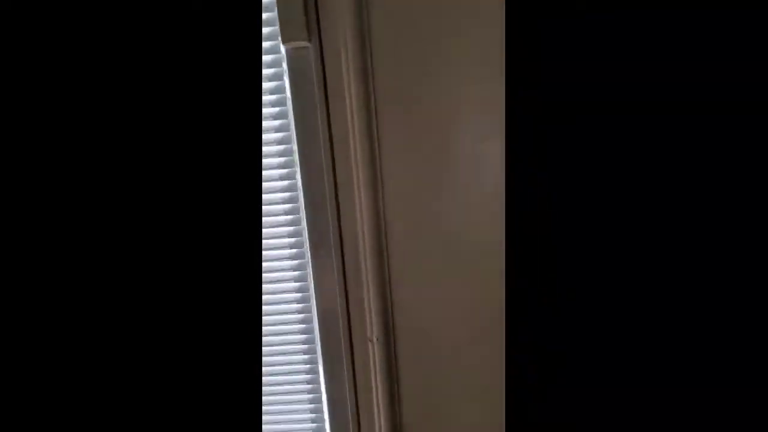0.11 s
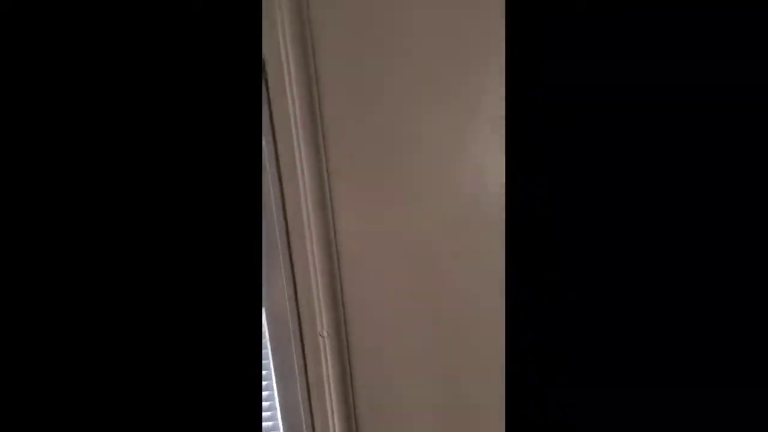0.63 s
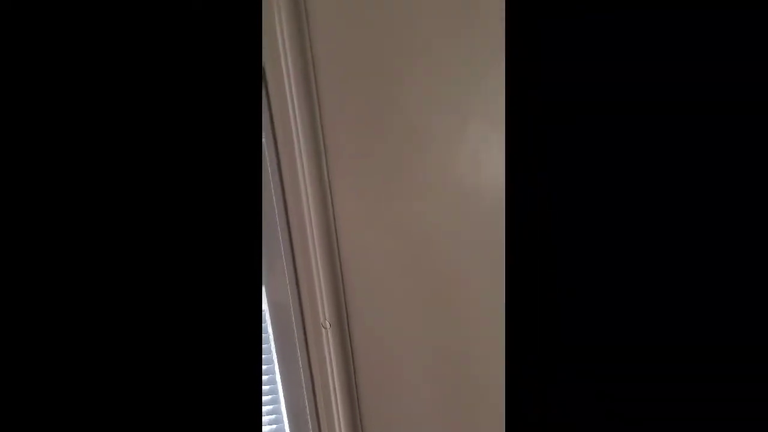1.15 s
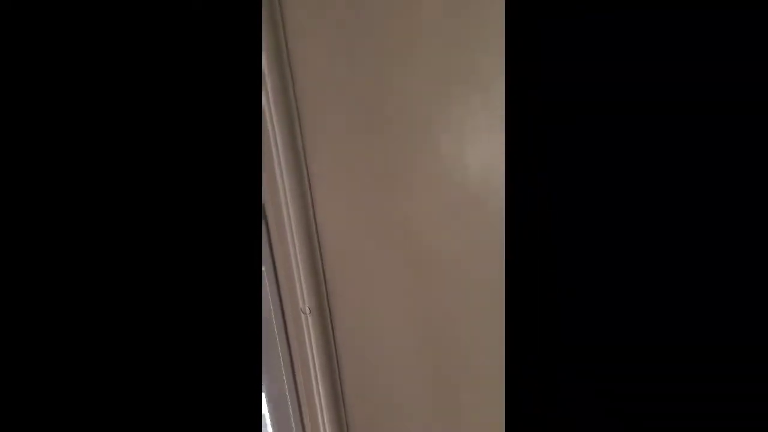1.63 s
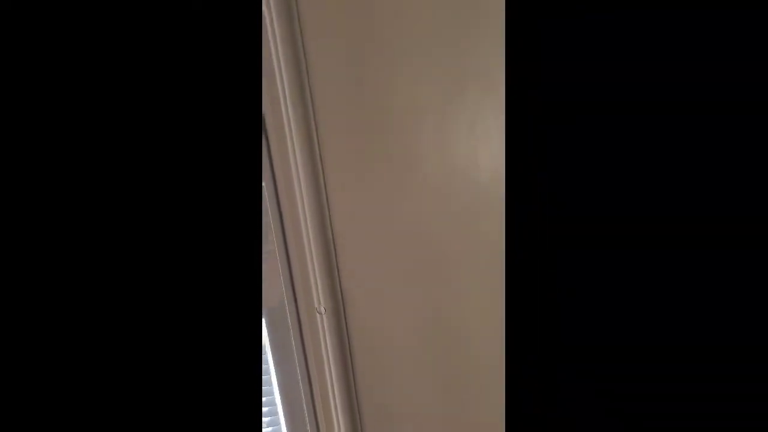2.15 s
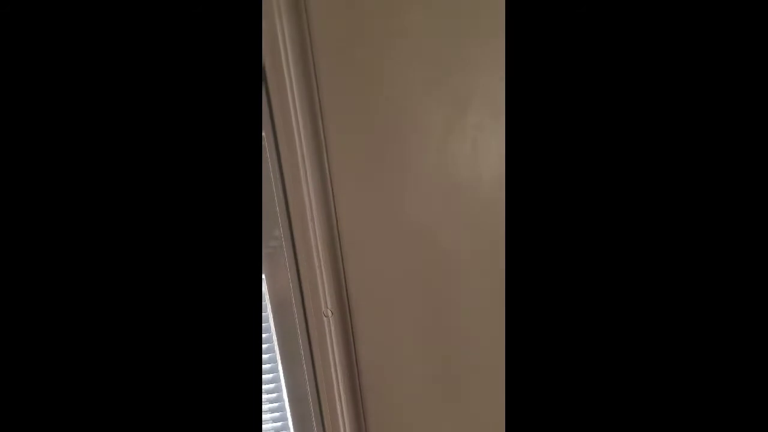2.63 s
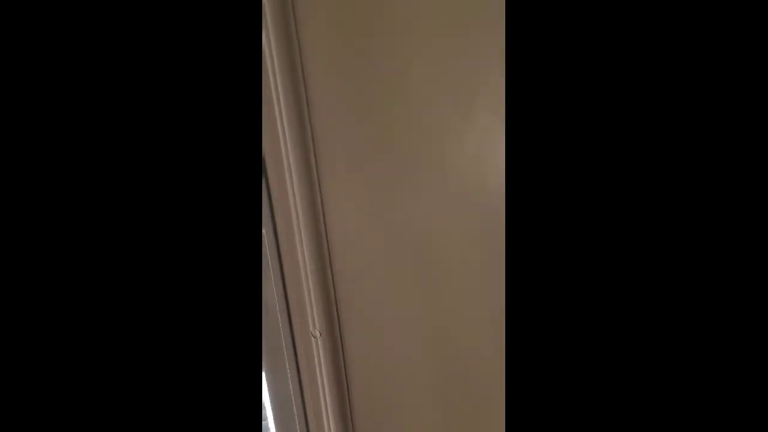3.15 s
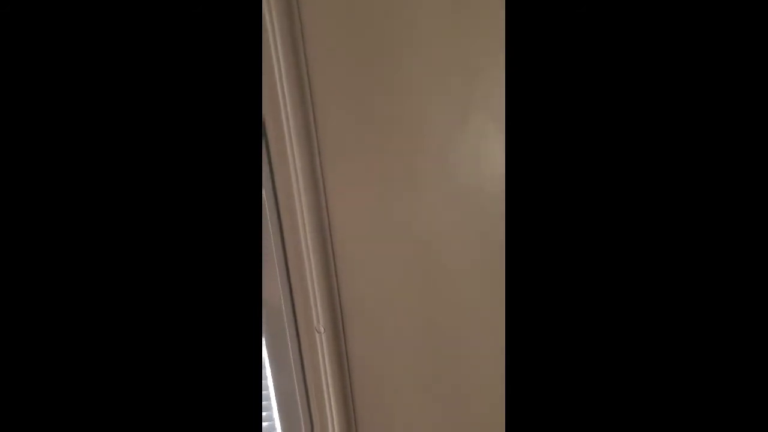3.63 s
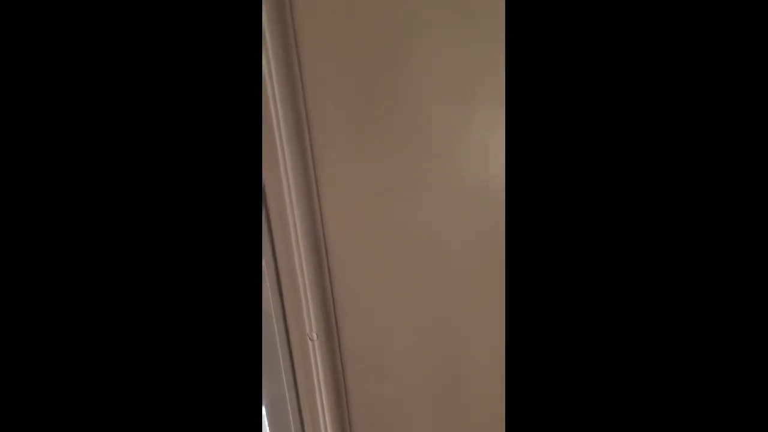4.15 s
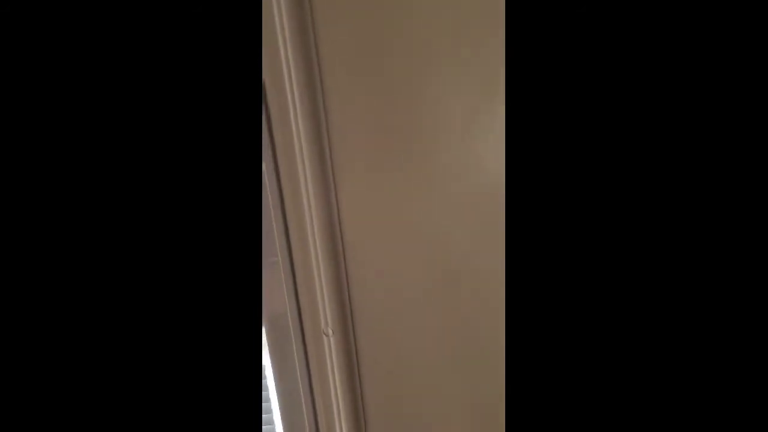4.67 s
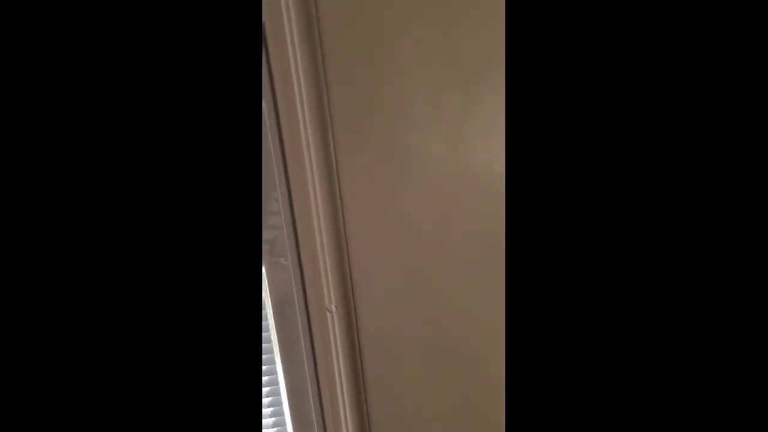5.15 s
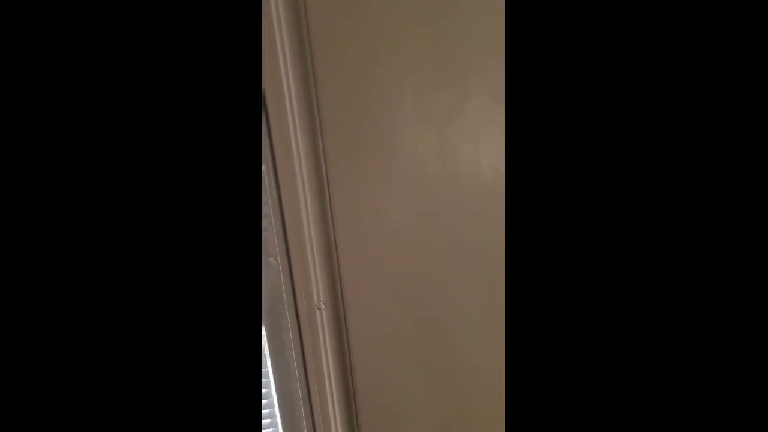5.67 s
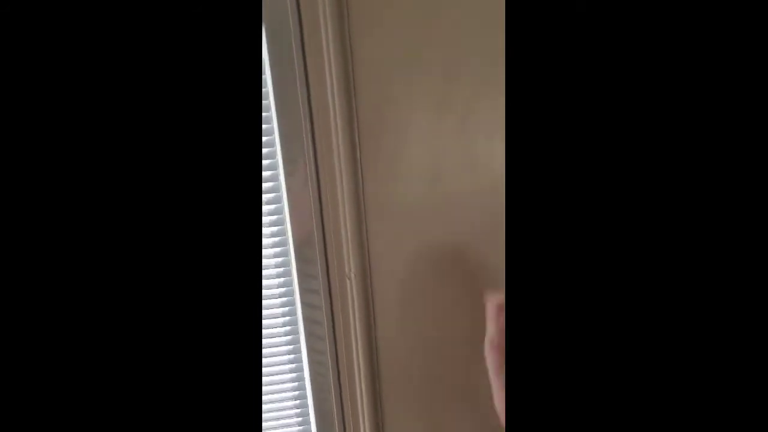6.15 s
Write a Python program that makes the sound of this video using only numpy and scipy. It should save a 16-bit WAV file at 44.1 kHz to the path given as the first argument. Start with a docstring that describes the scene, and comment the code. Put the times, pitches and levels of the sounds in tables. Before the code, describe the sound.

A sticking glazed door thuds against its frame with booming blows, sharp latch clicks and creaky seal rubbing, ringing through bare, empty rooms.

```python
"""A bare apartment: a sticking glazed door is shoved against its frame, close to a handheld two-port microphone.
The leaf booms and bounces: each blow drives decaying modes, a slow sway, pushes of air and a crunch of noise.
Latch and handle click: short chatters of contacts ring wood, metal and springs; a loose part tinkles.
The seal rubs as patchy, creaking noise with small ticks; the empty rooms ring on over a low hush."""
import sys
import numpy as np
from scipy import signal
from scipy.fft import rfft, irfft
from scipy.io import wavfile
from scipy.ndimage import uniform_filter1d

SR = 44100
rng = np.random.default_rng(int(sys.argv[2]) if len(sys.argv) > 2 else 0)


def field_ratio(decibels):
    """Amplitude ratio for a level in dB (20 dB per decade); scalars and array-likes work."""
    return 10 ** (np.asarray(decibels, dtype=float) / 20)


def wav_record(signal):
    """Record a signal, one row per channel, as 16-bit PCM in the file named by sys.argv[1]."""
    frames = np.transpose(np.atleast_2d(signal))
    bounded = np.clip(frames, -1, 1)
    # unit amplitude maps onto the largest positive 16-bit level
    quanta = np.round(bounded * 32767).astype(np.int16)
    wavfile.write(sys.argv[1], SR, quanta)


N = 277026  # length in samples
LEAD = SR // 10  # samples played before the start, so that a blow is already ringing

# what the latch rings with, struck by clicks and by grit in the seal: f/Hz, level/dB, t60/s
LATCH_MODES = [(1375, 12, 0.015), (1725, -5, 0.057), (1970, 0.5, 0.024), (1820, 17.5, 0.0028),
               (2400, 13, 0.0088), (2660, 14, 0.0045), (3210, 0.5, 0.01), (3450, -6, 0.033),
               (4080, 13, 0.0038), (4415, 12.5, 0.0061), (5340, 5.5, 0.0074), (5417, 4, 0.012)]


def evened(x):
    """Scales to rms 1."""
    return x / np.sqrt(np.mean(x ** 2) + 1e-20)


def read(points, hz):
    """Reads a (Hz, value) table on a log-frequency axis."""
    f, value = np.transpose(points)
    return np.interp(np.log(hz + 1), np.log(f + 1), value)


def add(mix, s, sound):
    """Adds a sound at time s."""
    part = mix[..., round(s * SR) + LEAD:][..., :sound.shape[-1]]
    part += sound[..., :part.shape[-1]]


def ring(modes, t):
    """One dying sine a mode, as rows."""
    hz, db, t60 = np.transpose(modes)[:, :, None]
    return field_ratio(db - 60 * t / t60) * np.sin(2 * np.pi * hz * t)


def diffuse(field, size=N + LEAD):
    """Noise at two ports from a magnitude field(Hz, s); the bass is alike at both."""
    # likeness of diffuse sound at the two ports: f/Hz, correlation
    likeness = [(30, 0.94), (150, 0.97), (300, 0.78), (600, 0.24), (1200, -0.2), (2500, 0.13),
                (12000, -0.13)]
    frames = size // 256 + 5
    hz = np.fft.rfftfreq(1024, 1 / SR)[:, None]
    s = (np.arange(frames) * 256 - LEAD) / SR
    a, b, c, d = rng.standard_normal((frames, len(hz), 4)).T
    same = np.clip(read(likeness, hz), -1, 1)
    left = a + 1j * b
    right = same * left + np.sqrt(1 - same ** 2) * (c + 1j * d)
    spectra = np.array([left, right]) * field(hz, s)
    return signal.istft(spectra, nperseg=1024, noverlap=768)[1][:, :size]


def hush():
    """Low rumble of the building and faint air: diffuse noise whose level wavers slowly."""
    # colour of the quiet rooms: f/Hz, relative density/dB
    colour = [(12, -61.5), (27, -32.5), (54, 7.5), (112, -12), (328, -26), (419, -19), (903, -33),
              (1650, -28), (3370, -42), (4310, -42.5), (12200, -63.5), (14000, -77)]

    def field(hz, s):
        waver_db = 2.85 * evened(uniform_filter1d(rng.standard_normal(len(s)), size=30))
        return field_ratio(read(colour, hz) + waver_db)

    return field_ratio(-52.5) * evened(diffuse(field))


def rooms(x, wet_db, near_db, count):
    """Bare walls: quick strong echoes from the doorway, then a dense tail that dies band by band.
    Several random tails take turns, cross-fading slowly, so no single echo pattern colours every sound."""
    # how long the rooms ring: f/Hz, t60/s
    room_t60 = [(60, 0.16), (250, 0.62), (700, 1), (2000, 1), (5000, 0.91), (12000, 0.66)]
    # colour of the echoes: f/Hz, relative level/dB
    room_gain = [(60, -5), (250, -7), (700, 3), (2000, 0), (5000, 3), (12000, -1)]

    def fall(hz, s):
        t60 = read(room_t60, hz)
        return field_ratio(read(room_gain, hz) - 60 * np.maximum(s, 0) / t60) / np.sqrt(t60)

    out, t = 0, np.arange(SR) / SR
    turn = np.arange(len(x)) / SR * np.pi / 1.5
    for k in range(count):
        tail = diffuse(fall, size=LEAD + SR)[:, LEAD:]
        onset = np.clip((t - 0.004) / 0.00091, 0, 1)
        tail *= onset * (1 + field_ratio(near_db - 60 * t / 0.19))
        tail /= np.linalg.norm(tail[0])
        share = np.sqrt(2 / count) * np.cos(turn + k * np.pi / count)  # squares sum to one
        out = out + signal.fftconvolve((share * x)[None], tail, axes=1)[:, :N + LEAD]
    return field_ratio(wet_db) * out


def seal():
    """Uneven rubbing noise that catches in clumps; each stroke drifts evenly from one level to another."""
    # strokes along the frame: start/s, end/s, relative level at start/dB, at end/dB, tilt/(dB/octave)
    strokes = [(0.41, 0.646, -44, -54.5, -2.5), (0.66, 0.82, -56.5, -42.5, -1),
               (0.84, 0.977, -38, -41, 1.5), (1.023, 1.286, -46, -43.5, 1.2), (1.277, 1.444, -43, -36, 0.1),
               (1.497, 1.67, -50.5, -42.5, -2), (2.016, 2.17, -42.5, -46, 2.5),
               (2.212, 2.449, -43, -61, -0.5), (2.472, 2.603, -50, -59, -1.5),
               (2.731, 2.904, -47.5, -39.5, -1), (2.946, 3.074, -39, -42, -1),
               (3.109, 3.149, -36, -30.5, 2), (3.504, 3.73, -66, -55, 1), (3.79, 4.014, -50.5, -37.5, -2),
               (4.283, 4.49, -50, -57.5, 1.5), (4.545, 4.61, -38.5, -50, -8),
               (4.712, 5.22, -55.5, -41.5, -1), (6.086, 6.203, -35, -61, -7)]
    # colour of the rub: f/Hz, relative density/dB
    rub_colour = [(88, -44.5), (150, -7.5), (184, -37.5), (210, -13), (544, -12), (935, -14), (1440, -10.5),
                  (4240, -18.5), (5610, -26.5), (13000, -44)]
    # creaks that rise as a stroke goes on: f at start/Hz, f at end/Hz, width/octaves, level/dB
    creaks = [(417, 554, 0.62, 5), (1250, 2000, 0.06, 0)]
    grip_s, slip_s = 0.026, 0.047  # every stroke fades in before its start and out after its end
    ticks_per_s, ticks_db = 49, -24.5
    start, end, from_db, to_db, tilt_db = np.transpose(strokes)[:, :, None]

    def drag(t):
        moving = np.clip(np.minimum(1 + (t - start) / grip_s, 1 + (end - t) / slip_s), 0, 1)
        done = np.clip((t - start) / (end - start), 0, 1)
        return moving * field_ratio(from_db + (to_db - from_db) * done)

    def field(hz, t):
        catches = evened(uniform_filter1d(rng.standard_normal(len(t)), size=2))
        patches = rng.standard_normal((len(t), len(hz))).T
        patches = uniform_filter1d(patches, size=10, axis=0)
        patches = evened(uniform_filter1d(patches, size=7, axis=1))
        nearest = np.maximum(start - t, t - end).argmin(axis=0)  # the stroke nearest to each frame
        shape = field_ratio(read(rub_colour, hz) + tilt_db[nearest, 0] * np.log2((hz + 50) / 1500))
        done = np.clip((t - start[nearest, 0]) / (end - start)[nearest, 0], 0, 1)
        for from_hz, to_hz, width, db in creaks:
            octaves = np.log2((hz + 1) / (from_hz + (to_hz - from_hz) * done))
            shape = shape * field_ratio(db * np.exp(-(octaves / width) ** 2))
        return shape / np.linalg.norm(shape, axis=0) * field_ratio(1.8 * np.tanh(catches) + 1.7 * patches)

    t, step = (np.arange(N + LEAD) - LEAD) / SR, SR // 1000
    # stick and slip of a few ms
    stick_slip = evened(uniform_filter1d(rng.standard_normal(N + LEAD), size=150))
    grit = field_ratio(1.4 * np.tanh(stick_slip))
    # grit in the seal lets go and ticks the latch
    sizes = field_ratio(4.5 * np.minimum(rng.exponential(1, N + LEAD), 3))
    slips = (rng.random(N + LEAD) < ticks_per_s / SR) * sizes
    latch_ring = ring(LATCH_MODES, t[LEAD:LEAD + 2048]).sum(0)
    ticks = evened(signal.oaconvolve(slips, latch_ring)[:N + LEAD])
    rubbing = evened(diffuse(field) * grit) + field_ratio(ticks_db) * np.array([np.roll(ticks, 14), ticks])
    level = np.interp(t, t[::step], drag(t[::step]).sum(0))
    return rubbing * level * field_ratio(-5.5)


def latch():
    """A brief chatter of contacts drives wood, latch and springs.
    Returns the near sound and the even burst sent into the rooms."""
    # clicks: t/s, relative level/dB, wooden knock re latch/dB, metal glint re latch/dB, strongest ring f/Hz
    clicks = [(0.539, -42.5, -11, -2.5, 4270), (0.546, -42.5, -3, -5.5, 3200),
              (0.603, -45.5, -9, -28, 4300), (0.789, -35, -23, -8, 1460), (0.804, -28.5, -26, -22, 2600),
              (0.808, -21, -13, -6, 3000), (0.824, -34, -25, -4, 3000), (1.273, -33, -10.5, -19, 4080),
              (1.392, -30, -6, -10.5, 1250), (1.426, -34.5, 3, -3.5, 2000), (1.687, -25.5, 5, -34, 1350),
              (1.777, -47, 22, -11, 1370), (1.784, -65, 9, 14, 4260), (2.006, -34, -26, -16, 3160),
              (2.138, -40, -10, -9, 4620), (2.147, -31.5, -5.5, -9.5, 4630), (2.472, -46.5, -1, -29, 1400),
              (2.595, -58.5, 2.5, -24.5, 3330), (2.674, -47.5, 3, -36, 1410),
              (2.929, -41.5, 0.5, -46, 1593), (2.944, -33.5, -9, -15, 1460),
              (3.098, -27, -9.5, -15.5, 1360), (3.176, -13, 1, -7.5, 1610), (3.184, -36.5, 4.5, -20, 720),
              (3.723, -34, -17.5, -16.5, 1597), (3.734, -40, 0.5, -24, 3530), (3.805, -38, -1, -17.5, 3440),
              (3.918, -43, -25, -37.5, 1650), (3.957, -22.5, -7.5, -17, 1430), (3.973, -13.5, -6, -5, 4230),
              (3.977, -14.5, -15, -24.5, 2450), (4.172, -33, -10, -15, 3250), (4.489, -44, 2, -9.5, 4250),
              (4.537, -33.5, -8, -12.5, 2470), (4.642, -33.5, -4, -6, 2500),
              (5.019, -44.5, -4.5, 3.5, 2980), (5.172, -23, -4.5, -10, 2470), (5.34, -30, -24, -1, 4220),
              (5.343, -29, -2, -19, 2006), (5.973, -48.5, -5, -15.5, 1970), (6.018, -44, 2.5, -5, 2400),
              (6.07, -36.5, -2.5, -15, 1320)]
    # wood round the lock: f/Hz, level/dB, t60/s
    knock_modes = [(351, -26, 0.28), (400, -12.5, 0.12), (415, -31.5, 0.14), (536.5, -2.5, 0.039),
                   (596, -23, .18), (560, 8.5, 0.0038), (688, -20, 0.21), (754, -27.5, 0.39),
                   (735, -3, 0.044), (810, -1.5, 0.012), (920, -21, 0.013), (1050, -12, 0.012)]
    # bolt and springs: f/Hz, level/dB, t60/s
    glint_modes = [(5640, 12.5, 0.0012), (7040, 1.5, 0.0054), (7170, -0.5, 0.0073), (8400, 4, 0.0034),
                   (8940, 1, 0.0037), (10550, 2, 0.0021), (10980, -3, 0.0049), (12280, -8, 0.0074)]
    # touches of a loose metal part: t/s, level/dB
    tinkles = [(4.638, -60.5), (6.065, -62.5)]
    # ring of the loose part: f/Hz, level/dB, t60/s
    loose_modes = [(7370, -4, .13), (7860, -6, .3), (8150, -1, .5), (8270, -9, .25), (9420, -4, .25),
                   (9550, -3, .35), (12040, -11, .4), (12910, -10, .13)]
    # a click comes back from jamb and wall: delay/s, left level/dB, right level/dB
    bounces = [(.0065, -13, -14), (0.0135, -19, -13), (.019, -17, -26)]
    early_s = 0.006  # each burst starts this long before its click
    slide_s, slide_db = 0.0024, -11  # parts slide into contact around the click
    snap = 12  # the one hard contact of a click, beside the chatter round it
    faint_db, firm_db = -71, -41  # a faint click is a dry tick; from firm up its strongest ring stands out fully
    jiggle_db = 8.5  # the loose part is not held still: each ring wavers this much

    out, spread = np.zeros((2, N + LEAD))
    t = np.arange(SR // 3) / SR
    tables = (LATCH_MODES, knock_modes, glint_modes)
    chance = rng.standard_normal((len(clicks), SR // 20))
    for (s, db, knock_db, glint_db, ring_hz), hit in zip(clicks, chance):
        u = t[:len(hit)] - early_s
        after = np.maximum(u, 0)
        force = np.exp(-after / 0.0015) + 0.037 * np.exp(-after / 0.0014)
        force *= np.minimum(after / 0.00059, 1)
        slide = field_ratio(slide_db) * np.exp(-abs(u) / slide_s)
        contacts = hit ** 3 * (force + slide)  # few strong touches among many weak
        contacts[round((early_s + 0.001) * SR)] += snap
        lift_db = 9.5 * np.clip((db - faint_db) / (firm_db - faint_db), 0, 1)
        for modes, part_db in zip(tables, (0, knock_db, glint_db)):
            octaves = np.log2(np.transpose(modes)[0] / ring_hz)
            near = field_ratio(2 * lift_db / (1 + (octaves / 0.035) ** 2) - lift_db)  # favours the strongest ring
            # neighbours swing in opposite senses
            rings = ring(modes, t) * (-1) ** np.arange(len(modes))[:, None]
            body = near @ rings
            even = near ** 0.83 @ rings  # summed over all directions the colour is milder
            sound = signal.fftconvolve(contacts, body)
            size = field_ratio(db + part_db - 6.5)
            add(out, s - early_s, size * sound / np.std(sound[265:665]))  # evened over 9 ms from the click
            add(spread, s, size * even / np.std(even[:400]))

    t = np.arange(SR // 2) / SR
    wavers = rng.standard_normal((len(tinkles), len(loose_modes), len(t)))
    wavers = uniform_filter1d(wavers, size=500)
    for (s, db), waver in zip(tinkles, wavers):
        add(out, s, field_ratio(db) * (ring(loose_modes, t) * field_ratio(jiggle_db * evened(waver))).sum(0))

    small = signal.butter(3, 340, "high", fs=SR, output="sos")  # small parts radiate no bass
    out, spread = signal.sosfilt(small, [out, spread])
    bounced = sum(field_ratio([[left_db], [right_db]]) * np.roll(out, round(s * SR))
                  for s, left_db, right_db in bounces)
    return np.array([np.roll(out, 14), out]) + bounced, spread  # the lock is nearer the right port


def leaf():
    """Each blow slaps the upper modes at once; the lowest ones swell as the heavy leaf flexes.
    Returns the near sound and what is sent into the rooms, where the crunch keeps its plain colour."""
    # blows of the leaf on the frame: t/s, relative slap level/dB, relative boom level/dB, hardness f/Hz
    thuds = [(-.048, -3.5, -12, 550), (.059, -13.5, -50, 475), (0.602, -44.5, -55, 300),
             (.806, -36, -44, 400), (1.114, -46, -82, 400), (1.401, -35.5, -41.5, 400),
             (1.433, -39.5, -75, 400), (1.451, -56, -68, 200), (1.6815, -8, -13.5, 440),
             (1.7744, -18, -28.5, 463), (2.214, -36.5, -54, 306), (3.19, -32, -56, 250),
             (3.974, -33, -54, 510), (4.64, -36.5, -74, 400), (5.176, -33, -41, 350),
             (5.356, -31.5, -25.5, 90.4), (5.363, -24, -39, 290), (5.381, -36, -30, 250),
             (5.456, -35, -65, 198), (5.4275, -43, -32, 187), (6.074, -44, -68, 515)]
    # the leaf and its panes: f/Hz, level/dB, t60/s
    leaf_modes = [(114.9, 5.5, 0.16), (151.54, -0.5, 0.48), (189, 6, 0.12), (207.7, -21, 0.2),
                  (225.6, 22, 0.029), (250, -13.5, 0.15), (281, 0.5, 0.051), (352, -7, 0.27),
                  (418, -10, 0.49), (454, -17, 0.66), (479, 4.5, 0.077), (740, -4, 0.055), (809, -22, 0.36),
                  (1197, -14.5, .3), (1328, -14, 0.72)]
    # the whole leaf sways on its hinges: f/Hz, level/dB, t60/s
    sway_modes = [(32.8, -0.5, 0.67), (56.4, 4.5, 0.55), (65, -12, .3)]
    # seal and frame crushed by a blow: f/Hz, relative level/dB
    crunch_colour = [(500, -47), (800, -4.5), (1350, 8), (2000, -4), (3000, -10), (5000, -22),
                     (8000, -30.5), (13000, -33.5)]
    # the bent leaf springs back in one push of air: delay/s, f/Hz, width/s, level re boom/dB
    rebound = (.054, 48, 0.0225, -12)
    swell_s = 0.022
    cushion_s, cushion_db = 0.012, -18  # air squeezed ahead of the closing leaf: build-up, level re boom

    out, crushed, sent = np.zeros((3, N + LEAD))
    t = np.arange(SR) / SR
    hz = np.transpose(leaf_modes)[0][:, None]
    rings = ring(leaf_modes, t)
    sway_hz, sway_db, t60 = np.transpose(sway_modes)[:, :, None]
    late, push_hz, width, push_db = rebound
    push = np.cos(2 * np.pi * push_hz * (t - late)) * np.exp(-((t - late) / width) ** 2 / 2)
    sway = field_ratio(sway_db - 60 * t / t60) * np.cos(2 * np.pi * sway_hz * (t - late))
    sway = sway.sum(0)  # in step at the rebound
    ahead = t[:LEAD // 2]
    to_go = ahead[-1] - ahead
    cushion = np.exp(-to_go / cushion_s) * np.minimum(to_go / 0.002, 1)
    colour = field_ratio(read(crunch_colour, np.fft.rfftfreq(4096, 1 / SR)))
    grit = irfft(rfft(rng.standard_normal((len(thuds), 4096))) * colour)
    plain = np.roll(irfft(colour), 256)[:512] * np.hanning(512)
    u = t[:4096] / 0.007
    crush_shape = np.minimum(8 * u, 1) * np.exp(-u)

    for (s, slap_db, boom_db, hard_hz), crunch in zip(thuds, grit):
        boom = field_ratio(boom_db) * (1 - np.exp(-(t / swell_s) ** 2))
        slap = field_ratio(slap_db) / (1 + (hz / hard_hz) ** 2) ** .5  # a soft blow starves the high modes
        slapped = np.minimum(t / 0.0018, 1) * (slap * rings).sum(0)
        add(out, s, 1.04 * boom * sway + 0.19 * slapped)
        add(out, s, field_ratio(boom_db + push_db) * push)
        add(out, s - ahead[-1], field_ratio(boom_db + cushion_db) * cushion)
        hardness = hard_hz / 500
        add(crushed, s, field_ratio(slap_db - 6.5) * hardness * evened(crunch) * crush_shape)
        add(sent, s, field_ratio(slap_db - 19) * hardness * evened(plain))
    near = out + crushed
    return np.array([near, np.roll(near, 12)]), out + sent  # the leaf is nearer the left port


def ports(x):
    """Each microphone port loses the deepest bass, the left a little more."""
    return np.array([signal.lfilter(*signal.butter(1, hz, "high", fs=SR), port)
                     for hz, port in zip((24, 10), x)])


def scene():
    """Door and latch with their echoes, over the seal and the quiet."""
    door, sent = leaf()
    lock, spread = latch()
    # the walls are too close to scatter the sway
    upper = signal.lfilter(*signal.butter(2, 90, "high", fs=SR), sent)
    echoes = rooms(upper, wet_db=3.5, near_db=4.5, count=2)
    echoes = echoes + rooms(spread, wet_db=-2.0, near_db=2.5, count=3)
    return ports(door + lock + echoes + seal() + hush())[:, LEAD:]


def low_pass(x):
    """Removes everything above the highest recorded frequency."""
    return signal.sosfilt(signal.butter(12, 14330, fs=SR, output="sos"), x)


def record(dry):
    """A steep low-pass cuts off the top."""
    band = signal.oaconvolve(dry, signal.firwin(255, 13600, fs=SR)[None], "same")
    return low_pass(band)


dry = scene()
out = record(dry)
wav_record(out)
```